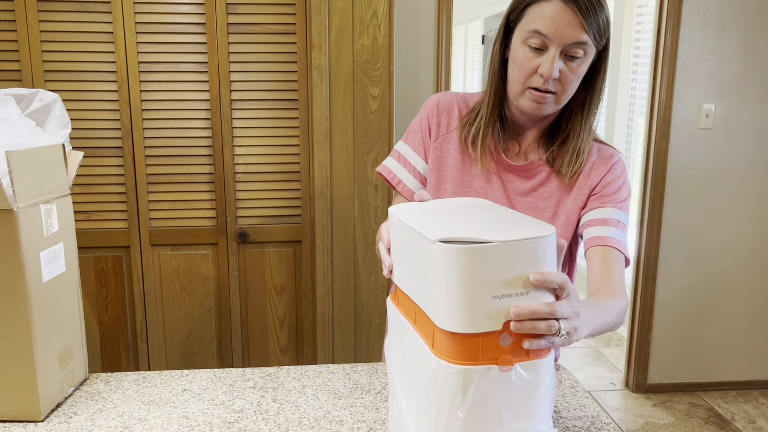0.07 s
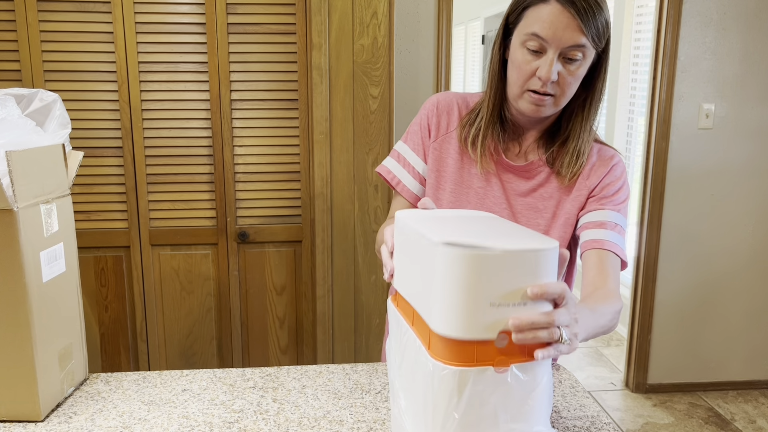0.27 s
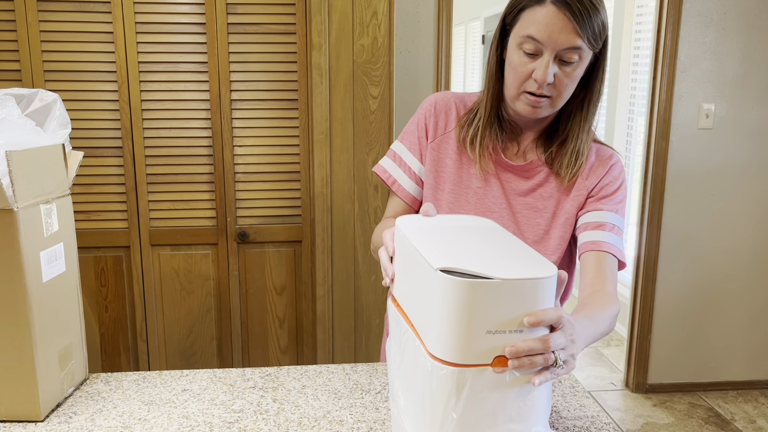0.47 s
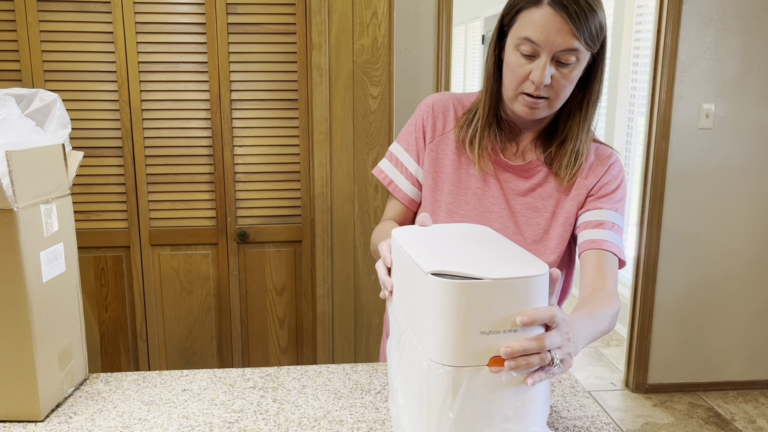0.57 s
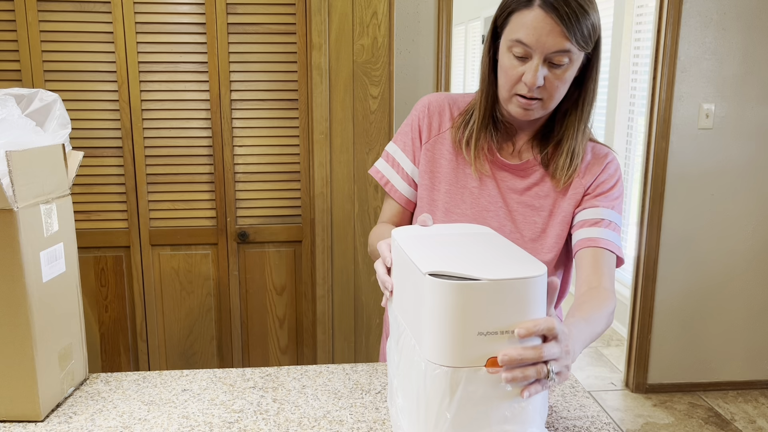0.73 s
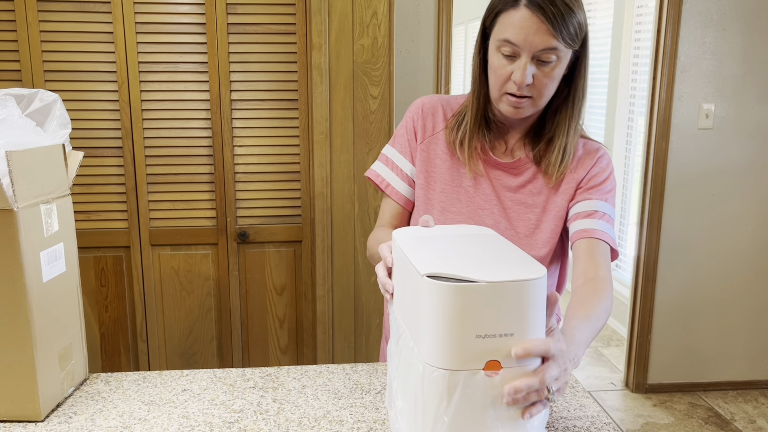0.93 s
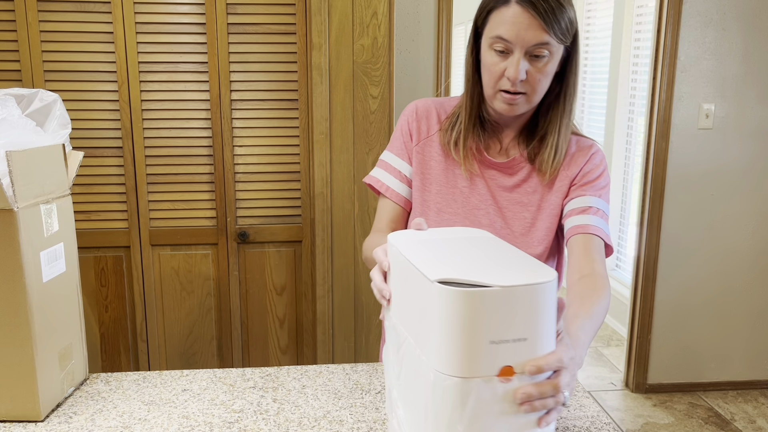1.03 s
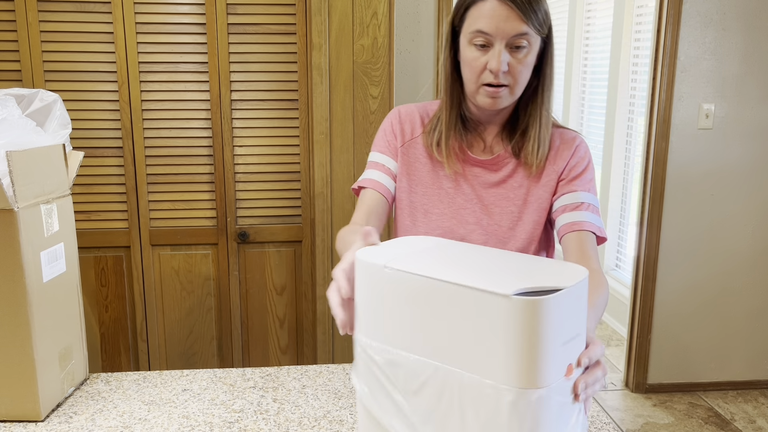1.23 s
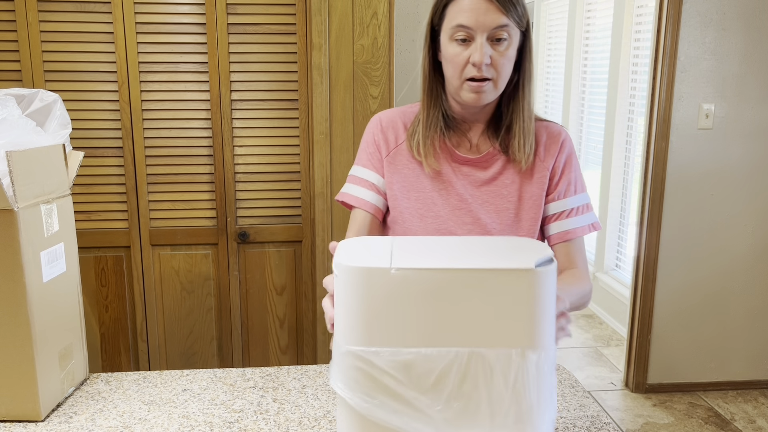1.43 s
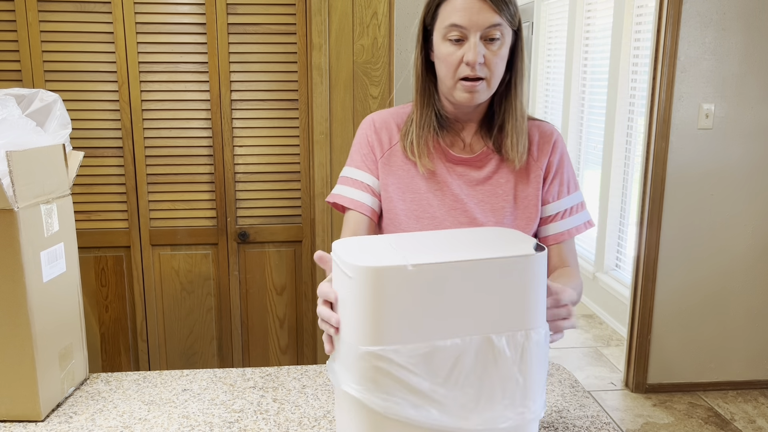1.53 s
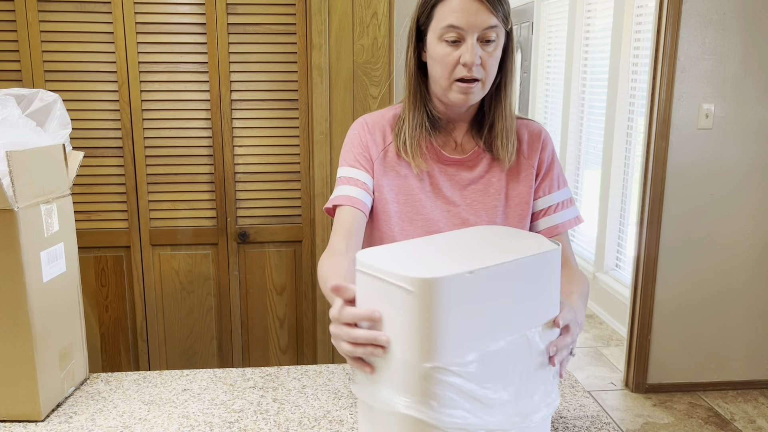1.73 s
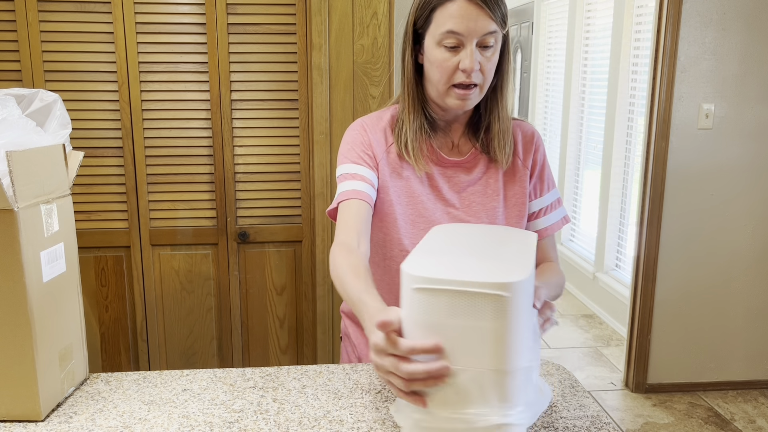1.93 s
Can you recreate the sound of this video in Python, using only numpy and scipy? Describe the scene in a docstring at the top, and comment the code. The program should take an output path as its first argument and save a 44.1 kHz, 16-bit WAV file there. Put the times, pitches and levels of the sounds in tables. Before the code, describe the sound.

Close stereo pickup in a reverberant kitchen: faint lid rubbing and low bumps, two sharp plastic snaps in quick succession, the second duller, then quiet hollow knocks and light base rubbing on a counter.

```python
"""A plastic lid is pushed down over the bag-lined rim of a small bin, in a kitchen.
It scrapes along the rim (noise grains); two catches snap home and ring the hollow shell (decaying modes).
Hands turn the bin on the counter: soft bumps (low modes), edge ticks (noise bands), a short creak
(mode bursts), a faint squeak (gliding tone), the hiss of the bag and a low rumble (filtered noise)."""
import sys
import numpy as np
from scipy import signal
from scipy.fft import rfft, irfft
from scipy.io import wavfile

SR = 44100
rng = np.random.default_rng(int(sys.argv[2]) if len(sys.argv) > 2 else 0)


def materialize(psi):
    """Save the field psi as 16-bit PCM at rate SR to the path in sys.argv[1].

    A 1-D psi becomes a single channel; in a 2-D psi each row is a channel.
    """
    bounded = np.clip(np.atleast_2d(psi).T, -1, 1)
    quanta = np.round(bounded * 32767).astype(np.int16)
    wavfile.write(sys.argv[1], SR, quanta)


N = 88200
TIME = np.arange(N) / SR
FREQS = np.maximum(np.arange(N // 2 + 1) * SR / N, 1)


def amp(db):
    """Decibels to gain."""
    return 10 ** (np.asarray(db) / 20)


def unit(x):
    """Scale to rms 1."""
    return x / np.sqrt(np.mean(x ** 2) + 1e-20)


def at_hz(rows, hz, axis=1):
    """Read a table column on a log-frequency axis."""
    rows = np.array(rows)
    return np.interp(np.log(hz), np.log(rows[:, 0]), rows[:, axis])


def level(rows):
    """Gain from a curve of (time_s, level_db), silent outside it."""
    time_s, level_db = np.transpose(rows)
    inside = (TIME >= time_s[0]) * (TIME <= time_s[-1])
    return amp(np.interp(TIME, time_s, level_db)) * inside


def fade(start_s, t60_s):
    """Exponential decay beginning at start_s."""
    decay = np.exp(-np.log(1000) * np.clip((TIME - start_s) / t60_s, 0, 10))
    return (TIME >= start_s) * decay


def swing(start_s, hz, t60_s, rise_s):
    """A mode that swells from start_s and dies away."""
    age_s = np.maximum(TIME - start_s, 0)
    rise = 1 - np.exp(-age_s / rise_s)
    return np.sin(2 * np.pi * hz * age_s) * fade(start_s, t60_s) * rise


def resonate(x, hz, width_hz):
    """Two-pole resonance with gain near 1 on top."""
    radius = np.exp(-np.pi * width_hz / SR)
    zeros = np.array([1, 0, -1]) * (1 - radius * radius) / 2
    poles = [1, -2 * radius * np.cos(2 * np.pi * hz / SR), radius * radius]
    return signal.lfilter(zeros, poles, x + 1e-18)


def noise_band(hz, width_hz):
    """Noise through two stacked resonances, rms 1."""
    narrow = resonate(rng.standard_normal(N), hz, width_hz)
    return unit(resonate(narrow, hz, 2 * width_hz))


def in_room(x, room, wet_db):
    """Direct sound plus its reverberation."""
    wet = signal.fftconvolve(x[None], room, axes=1)[:, :N]
    return x + amp(wet_db) * wet


def snaps(room):
    """Each catch strikes the same shell modes, in a mix set by its place on the rim."""
    # catches: start_s, level_db, room_db, contact_lowpass_hz
    catches = [(0.3783, -17.5, 2, 6500), (0.5401, -18, 1.5, 3720)]
    # shell modes: pitch_hz, t60_s, first_catch_db, second_catch_db
    shell = [(171.2, 0.1, -6, 4), (265, 0.052, 3.5, -3.5), (378, 0.03, -18, 2), (533, 0.02, -2.5, -0.5),
             (715, 0.019, -5.5, 2.5), (794, 0.034, -3.5, -2), (980, 0.012, 5, 6), (1211, 0.021, -5, 2),
             (1466, 0.03, -5, -6), (2025, 0.0051, 4.5, 12.5), (2700, 0.0027, 2, -3.5),
             (3815, 0.0047, -2.5, 0.5), (4950, .005, -18, -4.5), (6800, 0.0031, -27, -1.5)]
    # bending waves: low modes arrive later and swell more slowly
    lag_cycles, rise_cycles = 0.31, 0.55
    out = 0
    for k, (start_s, level_db, wet_db, contact_hz) in enumerate(catches):
        ring = 0
        for i, (hz, t60_s, *strengths_db) in enumerate(shell):
            mode = swing(start_s + lag_cycles / hz, hz, t60_s, rise_cycles / hz)
            sign = (-1) ** i  # neighbours swing in opposite directions
            ring = ring + sign * amp(level_db + strengths_db[k]) * mode
        ring = signal.sosfilt(signal.butter(2, contact_hz, fs=SR, output="sos"), ring)
        out = out + in_room(ring, room, wet_db)
    return out


def rub(curve, colour):
    """Friction: dense tiny slips of uneven size and random sign."""
    grains_per_s, spread_db = 5600, 3.5
    sizes = amp(spread_db * np.minimum(rng.exponential(1, N), 4)) * rng.choice([-1, 1], N)
    grains = sizes * (rng.random(N) < grains_per_s / SR)
    return level(curve) * unit(irfft(rfft(grains) * amp(at_hz(colour, FREQS)), N))


def rim_rub():
    """The lid scrapes down the rim: friction grains on a level curve."""
    # scrape level: time_s, level_db
    curve = [(0, -58), (0.06, -51.5), (0.105, -62.5), (0.138, -44), (0.165, -52), (0.268, -69.5),
             (0.277, -43), (0.37, -50), (0.45, -46), (0.5, -47), (0.53, -30), (0.56, -49)]
    # rim spectrum: freq_hz, gain_db
    colour = [(100, 3), (300, 12.5), (550, 4), (1100, 2.5), (1700, -6), (2400, -7.5), (5000, -19.5),
              (8000, -29.5), (15000, -30)]
    return rub(curve, colour)


def ticks():
    """Plastic edges click past each other: decaying noise bands."""
    # edge clicks: start_s, level_db, centre_hz, t60_s
    clicks = [(0.116, -48.5, 1495, 0.039), (0.136, -43, 1500, 0.022), (0.2736, -47, 1100, 0.027),
              (0.304, -50.5, 3460, .015), (0.3820, -25, 11600, .011), (0.3824, -28, 4730, 0.013),
              (0.3874, -30, 3380, 0.012), (0.394, -27, 1300, 0.014), (0.405, -39, 4200, .012),
              (0.412, -34.5, 11600, 0.0091), (0.4122, -37, 3600, 0.02), (0.544, -44.5, 11100, 0.018),
              (1.121, -56, 5000, 0.031), (1.232, -50, 1290, 0.015), (1.232, -47, 3900, 0.004),
              (1.304, -54, 3900, 0.0063), (1.699, -56, 4000, 0.021), (1.985, -57, 780, .04)]
    out = 0
    for start_s, level_db, hz, t60_s in clicks:
        out = out + amp(level_db) * fade(start_s, t60_s) * noise_band(hz, 0.6 * hz)
    return out


def bumps():
    """Hands and counter bump the hollow bin; a wall flexes and swings a few cycles."""
    # wall bumps: start_s, level_db, pitch_hz, t60_s
    pushes = [(0.001, -33.5, 202.4, 0.15), (0.132, -34.5, 210, 0.09), (0.150, -31.5, 130.3, 0.17),
              (0.278, -26, 201.4, 0.094), (0.312, -32.5, 257, 0.17), (0.358, -28, 140, 0.068),
              (0.397, -28.5, 151, 0.31), (0.526, -31.5, 147.7, 0.3), (0.547, -26.5, 94.8, 0.22),
              (0.97, -37.5, 156, 0.17), (1.06, -44, 127, 0.078), (1.218, -41.5, 68.8, 0.63),
              (1.252, -34.5, 173.5, 0.35), (1.505, -37.5, 283, 0.07), (1.532, -36, 235.4, .1),
              (1.559, -32, 170.6, .12), (1.586, -31, 181, 0.23), (1.71, -29.5, 162.5, 0.15)]
    rise_s, overtone_ratio, overtone_db = 0.0013, 1.9, -15
    out = 0
    for start_s, level_db, hz, t60_s in pushes:
        wall = swing(start_s, hz, t60_s, rise_s)
        overtone = swing(start_s, hz * overtone_ratio, t60_s, rise_s)
        out = out + amp(level_db) * (wall + amp(overtone_db) * overtone)
    return out


def creak():
    """The base sticks and slips on the counter; each slip rings the base and jogs the wall."""
    # separate slips: start_s, level_db
    slips = [(1.5028, -44), (1.5292, -39), (1.5548, -44), (1.5808, -47), (1.984, -46), (1.994, -41)]
    # base and wall modes: pitch_hz, level_db, t60_s
    modes = [(2750, -2, .016), (3150, -3, .012), (3750, -8, .012), (400, -2, .04)]
    out = 0
    for start_s, level_db in slips:
        for hz, mode_db, t60_s in modes:
            out = out + amp(level_db + mode_db) * swing(start_s, hz, t60_s, rise_s=0.0012)
    return out


def base_rub():
    """The base rubs on the counter: friction grains on a level curve."""
    # rub level: time_s, level_db
    curve = [(1.2, -63.5), (1.235, -50.5), (1.35, -63.5), (1.48, -60.5), (1.535, -51), (1.6, -53.5),
             (1.68, -72), (1.71, -74), (1.8, -87), (1.96, -99), (2.0, -79)]
    # base spectrum: freq_hz, gain_db
    colour = [(100, 2.5), (330, 2.5), (600, -4), (1200, -10), (2000, -21.5), (5000, -27), (15000, -29.5)]
    return rub(curve, colour)


def squeak():
    """A thin tone that swells, fades and rises in pitch as the bin turns."""
    start_s, length_s, level_db = 1.665, 0.17, -62.5
    start_hz, glide_hz_per_s = 985, 720
    age_s = np.clip(TIME - start_s, 0, length_s)
    phase = 2 * np.pi * np.cumsum(start_hz + glide_hz_per_s * age_s) / SR
    return amp(level_db) * np.sin(np.pi * age_s / length_s) * np.sin(phase)


def diffuse():
    """Left and right spectra of white noise arriving from all sides."""
    # stereo width: freq_hz, side_minus_mid_db
    width_table = [(60, -20), (120, -20.5), (220, -11), (400, -9), (700, 2), (1400, -1), (2000, -6),
                   (4400, -8), (8000, 8.5), (11000, -4), (15000, 7.5)]
    mid, side = rfft(rng.standard_normal((2, N)))
    width = amp(at_hz(width_table, FREQS))
    return np.array([mid + width * side, mid - width * side]) / np.sqrt(1 + width ** 2)


def wash(curve, colour):
    """Smooth diffuse noise on a level curve."""
    return level(curve) * unit(irfft(diffuse() * amp(at_hz(colour, FREQS)), N))


def bag_hiss():
    """Soft hiss of the bag: broad diffuse noise."""
    # hiss level: time_s, level_db
    curve = [(0, -94), (0.13, -55.5), (0.24, -71), (0.45, -55.5), (0.66, -61), (0.77, -55), (0.88, -59),
             (1.0, -57), (1.12, -57), (1.2, -61), (1.35, -64.5), (1.43, -59), (1.67, -63.5), (1.70, -47.5),
             (1.77, -55.5), (1.85, -53), (1.94, -56.5), (2.0, -53.5)]
    # hiss spectrum: freq_hz, gain_db
    colour = [(200, 5), (600, 1.5), (1500, -3), (4200, -3.5), (6500, -5.5), (8500, -2.5), (11000, -4),
              (15000, -7.5)]
    return wash(curve, colour)


def handling_rumble():
    """Low handling rumble: diffuse noise weighted to the bass."""
    # rumble level: time_s, level_db
    curve = [(0, -48), (0.25, -49.5), (0.33, -41), (0.48, -38.5), (0.65, -49.5), (0.87, -58), (1.15, -54.5),
             (1.3, -48), (1.42, -51.5), (1.57, -46.5), (1.8, -52), (2.0, -51.5)]
    # rumble spectrum: freq_hz, gain_db
    colour = [(20, -53), (40, -8.5), (65, 1.5), (120, 3), (190, 0), (330, -8), (520, -16.5), (1000, -27.5),
              (3000, -91)]
    return wash(curve, colour)


def kitchen_response():
    """Dense early echoes from counter and cupboards, then a tail that dies band by band."""
    # kitchen reverberation: freq_hz, level_db, t60_s
    bands = [(80, -16, .35), (180, -14, .35), (300, -5, .4), (650, -1, .47), (1200, -2, .52),
             (2200, -4, .46), (4000, 0, .42), (7000, -3, .35), (13000, -7, .22)]
    early_db, early_t60_s, first_echo_s = -4, 0.064, 0.0025
    noise, out = diffuse(), 0
    centres_hz = np.geomspace(60, 15000, 16)
    early = fade(first_echo_s, early_t60_s)
    for hz, pick in zip(centres_hz, np.eye(len(centres_hz))):
        # triangular bands on a log axis that sum to 1
        band = irfft(noise * np.interp(np.log(FREQS), np.log(centres_hz), pick), N)
        tail = fade(first_echo_s, at_hz(bands, hz, axis=2))
        shape = np.hypot(unit(tail), amp(early_db) * unit(early)) / np.sqrt(N)
        out = out + band * shape * amp(at_hz(bands, hz))
    return out


def scene():
    """Lid and handling in the kitchen, over hiss and rumble."""
    room = kitchen_response()
    friction = rim_rub() + base_rub() + squeak()
    handling = in_room(ticks(), room, wet_db=-2) + in_room(creak(), room, wet_db=-6)
    handling = handling + in_room(bumps(), room, wet_db=-9) + in_room(friction, room, wet_db=-0.5)
    return snaps(room) + handling + bag_hiss() + handling_rumble()


def record(dry):
    """Left and right lean by band; one treble band is opposed, another alike; little sounds above 15 kHz."""
    # channel balance: freq_hz, left_minus_right_db
    balance = [(100, 0.5), (700, -1), (1200, -1.5), (2400, 0.7), (4400, 4.5), (8000, 1.5), (15000, -0.5)]
    opposed_hz, alike_hz, cutoff_hz = (7600, 9400), (11500, 12700), 15400
    lean_db = np.outer([1, -1], at_hz(balance, FREQS)) / 2
    left, right = irfft(rfft(dry) * amp(lean_db), N)
    no_mid = signal.butter(3, opposed_hz, "bandstop", fs=SR, output="sos")
    no_side = signal.butter(3, alike_hz, "bandstop", fs=SR, output="sos")
    mid = signal.sosfilt(no_mid, (left + right) / 2)
    side = signal.sosfilt(no_side, (left - right) / 2)
    lowpass = signal.ellip(10, 0.2, 80, cutoff_hz, fs=SR, output="sos")
    return signal.sosfilt(lowpass, np.array([mid + side, mid - side]))


dry = scene()
out = record(dry)
materialize(out)
```